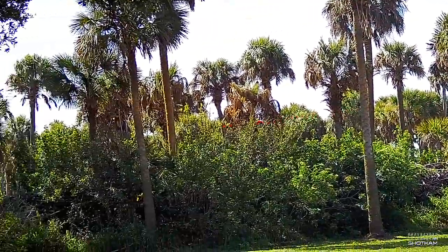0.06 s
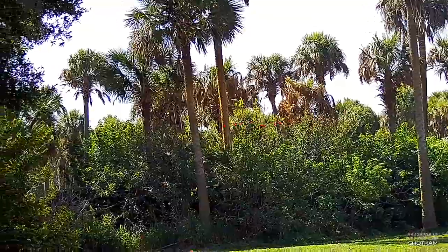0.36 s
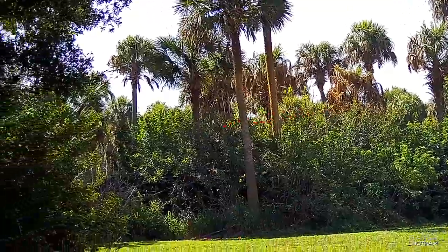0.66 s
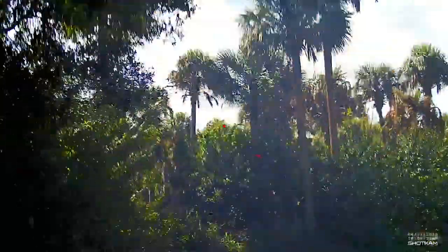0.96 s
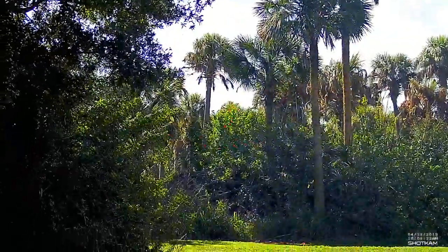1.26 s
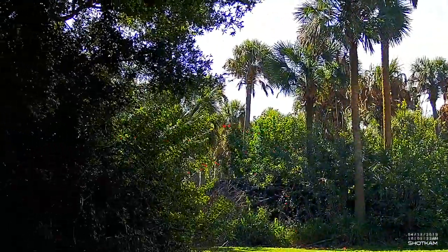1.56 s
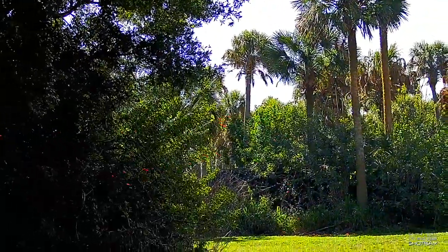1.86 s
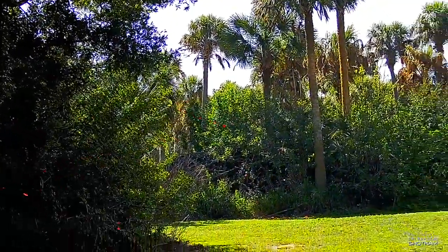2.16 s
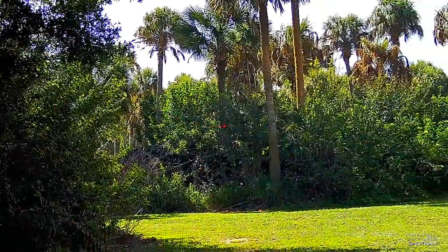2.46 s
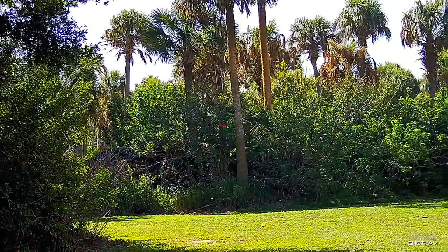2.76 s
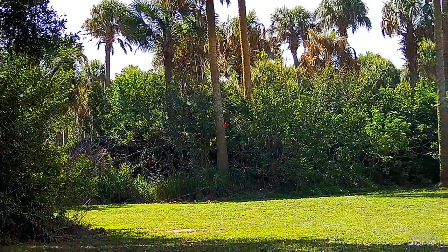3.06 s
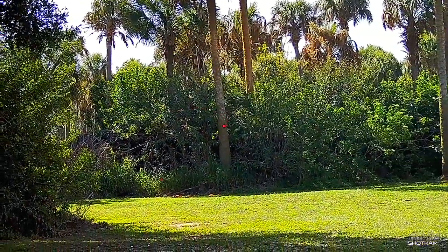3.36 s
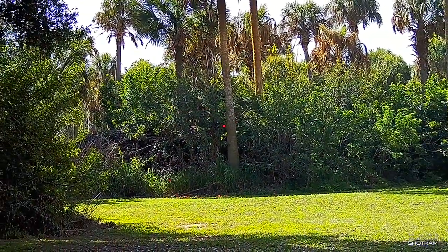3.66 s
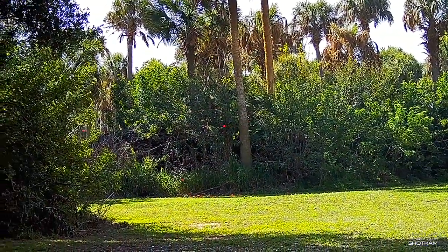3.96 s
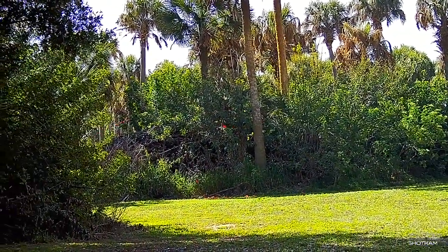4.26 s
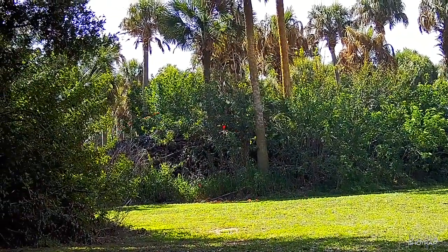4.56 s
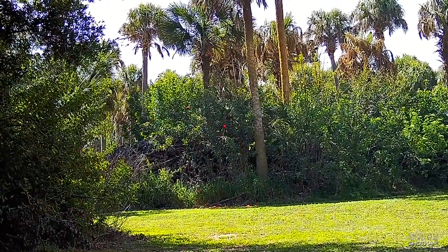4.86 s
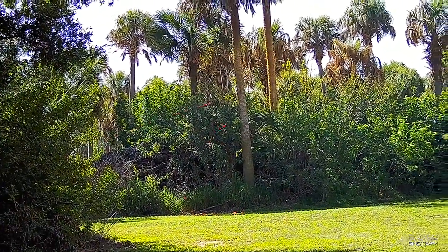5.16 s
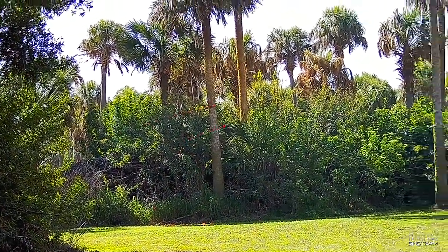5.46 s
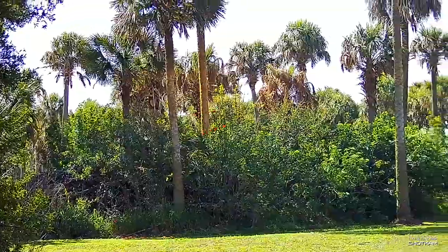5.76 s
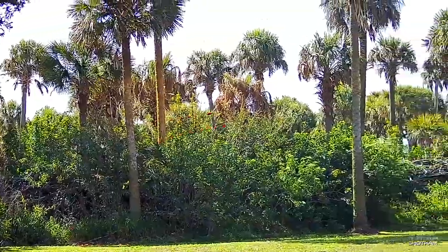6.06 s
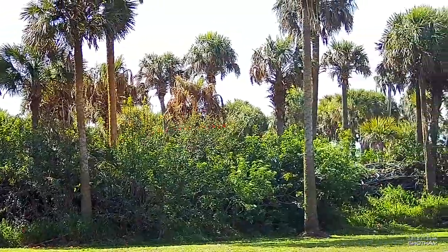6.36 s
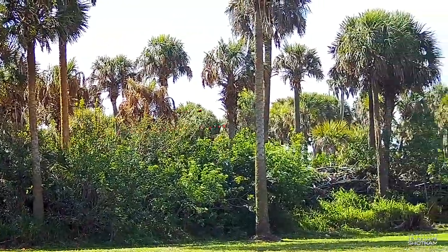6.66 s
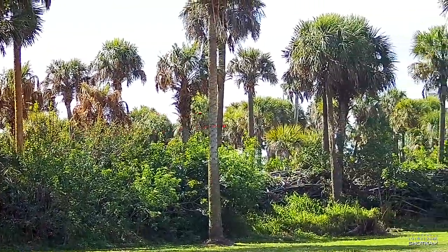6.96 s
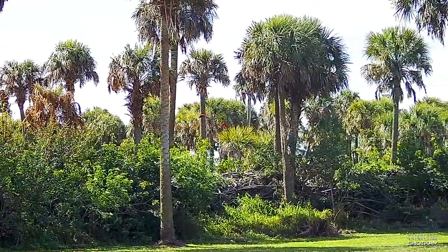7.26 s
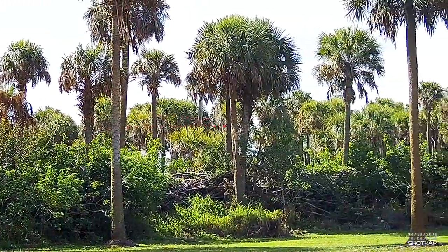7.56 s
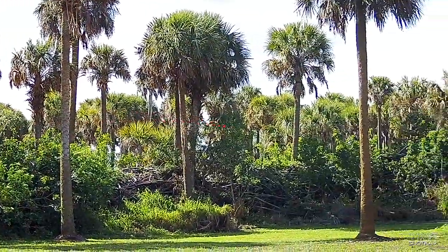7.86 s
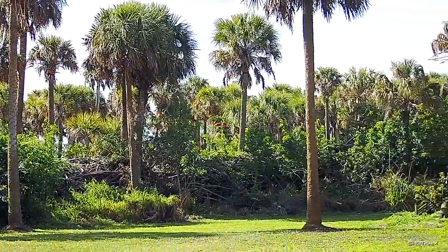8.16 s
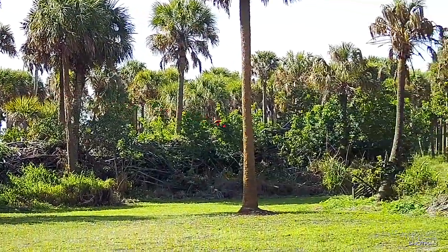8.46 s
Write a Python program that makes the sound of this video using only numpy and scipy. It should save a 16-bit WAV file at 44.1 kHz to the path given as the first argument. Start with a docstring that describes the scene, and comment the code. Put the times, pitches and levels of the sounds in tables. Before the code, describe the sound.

One very loud, distorted shotgun blast up close, echoing through trees, followed by two faint, dull shots far away.

```python
"""A faint hum and a light breeze, heard from a small camera clamped to a shotgun's barrel in a clearing.
The hammer falls and the gun fires once: the blast drives the microphone into hard clipping, the barrel
whips and rings, the bolt clatters, and the ring of palms throws back echoes. Two far shots follow.
The outdoor air, the woods and the far shots all sound through the camera's hollow, humming housing."""
import sys
import numpy as np
from scipy.fft import rfft, irfft, next_fast_len
from scipy.io import wavfile
from scipy.ndimage import uniform_filter1d, map_coordinates

SR = 44100
rng = np.random.default_rng(int(sys.argv[2]) if len(sys.argv) > 2 else 0)


def pcm_store(signal):
    """Save signal as 16-bit PCM."""
    levels = np.round(np.clip(np.atleast_2d(signal), -1, 1) * 32767)
    wavfile.write(sys.argv[1], SR, levels.astype(np.int16).T)


N = 375291
SHOT_S = 0.888

def amp(db):
    """Decibels to gain."""
    return 10 ** (np.asarray(db) / 20)

def unit(x):
    """x at rms 1."""
    return x / np.sqrt(np.mean(x ** 2) + 1e-20)

def since(start_s):
    """Seconds since start_s, zero before it."""
    return np.maximum(np.arange(N) / SR - start_s, 0)

def strike(start_s, rise_s, t60_s):
    """An envelope that rises and dies away."""
    t = since(start_s)
    return (1 - np.exp(-(t / rise_s) ** 2)) * np.exp(-np.log(1000) * t / t60_s)

def swell(peak_s, width_s, order=2):
    """A smooth hump; a higher order gives it steeper sides."""
    return np.exp(-np.abs((since(0) - peak_s) / width_s) ** order)

def wobble(rate_hz):
    """A smooth random curve, rate_hz knots a second."""
    knots = rng.standard_normal(int(N * rate_hz / SR) + 4)
    return map_coordinates(knots, [np.arange(N) * rate_hz / SR])

def filtered(x, response):
    """x through a frequency response."""
    size = next_fast_len(N + SR // 2)
    return irfft(rfft(x, size) * response(np.fft.rfftfreq(size, 1 / SR)), size)[:N]

def noise(response):
    """Noise of rms 1 with the given response."""
    return unit(filtered(rng.standard_normal(N), response))

def coloured(spectrum):
    """Noise of rms 1 shaped by rows of freq_hz, relative_db."""
    freq_hz, db = np.transpose(spectrum)
    return noise(lambda hz: amp(np.interp(np.log(hz + 1), np.log(freq_hz), db)))

def high_pass(hz, edge_hz):
    """Response of a gentle bass cut."""
    return 1j * hz / (edge_hz + 1j * hz)

def resonances(hz, modes):
    """Response of a hollow body: each resonance falls off steeply above its pitch."""
    peaks = sum((-1) ** k * amp(db) * pitch * width / (pitch ** 2 - hz ** 2 + 1j * hz * width)
                for k, (pitch, width, db) in enumerate(modes))
    return peaks * high_pass(hz, 80)

def burst(start_s, modes, t60_s, bright_hz, bass_cut_hz, rattle=.12):
    """A sharp push and its rattle ringing through resonances, rms 1 over its loudest 10 ms."""
    push = rattle * rng.standard_normal(N) * strike(start_s, .00089, t60_s)
    push[round(start_s * SR)] += 1
    ring = filtered(push, lambda hz: resonances(hz, modes)
                    * (high_pass(hz, bass_cut_hz) / (1 + 1j * hz / bright_hz)) ** 2)
    return ring / np.sqrt(uniform_filter1d(ring ** 2, size=441).max())

# wind right on the microphone: freq_hz, relative_db
BREEZE_SPECTRUM = [(10, 0), (30, 0), (60, -7), (110, -11), (200, -30), (500, -60)]
def breeze(level_db=-69, gusts_db=4):
    """Light air bumps softly against the microphone."""
    return amp(level_db) * unit(amp(gusts_db * wobble(7)) * coloured(BREEZE_SPECTRUM))

# the microphone's own noise: freq_hz, relative_db
FLOOR_SPECTRUM = [(10, -5.5), (30, -4), (70, -11), (130, -15), (300, -19), (600, -25.5), (1200, -27.5),
                  (3000, -31), (7000, -34)]
def microphone_floor(level_db=-65):
    """The microphone rumbles and hisses steadily."""
    return amp(level_db) * coloured(FLOOR_SPECTRUM)

# resonances of the camera housing around the microphone: pitch_hz, width_hz, gain_db
HOUSING_MODES = [(197, 30, 0), (508, 42, -12), (615, 70, -14), (705, 80, -15), (1075, 100, -21),
                 (1230, 130, -26), (1560, 200, -33), (2200, 250, -45)]
def housing_drone():
    """Noise of rms 1 hums in the housing's lowest resonance."""
    pitch_hz = HOUSING_MODES[0][0]
    return noise(lambda hz: resonances(hz, HOUSING_MODES[:1]) / (1 + ((hz - pitch_hz) / 60) ** 2))

# hum of the clearing's air at the microphone: time_s, level_db
HUM_LEVELS = [(0, -60), (.7, -66), (3.1, -63.5), (3.9, -75), (5.4, -66.5), (6.25, -62.5), (7.1, -73),
              (8.5, -76.5)]
def air_hum(upper_db=-14):
    """Outdoor air hums in the housing, more faintly in its upper resonances."""
    time_s, level_db = np.transpose(HUM_LEVELS)
    upper = amp(upper_db) * noise(lambda hz: resonances(hz, HOUSING_MODES[1:]) / (1 + (hz / 900) ** 2))
    return amp(np.interp(since(0), time_s, level_db)) * (housing_drone() + upper)

# two distant shots and first reflections: start_s, pop_db, bright_hz, bass_cut_hz, whump_db
FAR_ARRIVALS = [(4.233, -48, 1600, 304, -42), (4.242, -45, 800, 298, -55.5), (4.268, -42.5, 199, 101, -75),
                (5.612, -57.5, 650, 800, -72)]
def far_shots(t60_s=.073, whump_s=.0079):
    """Other guns far off: dull pops in the housing, each on a soft push of air."""
    out = np.zeros(N)
    for start_s, pop_db, bright_hz, bass_cut_hz, whump_db in FAR_ARRIVALS:
        pop = burst(start_s, HOUSING_MODES, t60_s, bright_hz, bass_cut_hz, rattle=.134)
        age = since(start_s) / whump_s
        whump = 2 * age * (2 - age) * np.exp(-age)
        out += amp(pop_db) * pop + amp(whump_db) * whump
    return out

# low rumble back from the trees: freq_hz, relative_db
RUMBLE_SPECTRUM = [(15, -2), (40, 0), (110, -3), (160, -5), (270, -1), (320, -2), (390, -19.5), (900, -45)]
def scatter(returns, air_hz, rumble_db):
    """Scatter from countless trees booms in the housing; distance dulls it above air_hz."""
    boom_power, body_power = np.zeros(N), np.zeros(N)
    for start_s, boom_db, body_db, t60_s in returns:
        envelope = strike(start_s, .02, t60_s)
        boom_power += (amp(boom_db) * envelope) ** 2
        body_power += (amp(body_db) * envelope) ** 2
    boom = housing_drone() + amp(rumble_db) * coloured(RUMBLE_SPECTRUM)
    body = noise(lambda hz: resonances(hz, HOUSING_MODES[1:])
                 * high_pass(hz, 180) / (1 + (hz / air_hz) ** 2))
    return np.sqrt(boom_power) * boom + np.sqrt(body_power) * body

# each shot dying evenly in the deep woods: start_s, boom_db, body_db, t60_s
WOOD_WASHES = [(.888, -26.5, -35, 2.2), (4.245, -51, -62.5, 3.26), (5.612, -69.5, -74.5, 2)]
# soft echoes from stands of trees farther out: start_s, boom_db, body_db
TREE_ECHOES = [(1.615, -38, -44), (1.743, -39.5, -51.5), (2.06, -59, -60.5), (4.495, -47, -64),
               (4.6, -49.5, -68), (4.81, -50.5, -70.5)]
def woods(echo_t60_s=.662):
    """The trees answer the near shot, then more dully the far ones."""
    bushes = (SHOT_S, -13, -11.5, .41)  # a wash from close by, strong and brief
    returns = [bushes, *WOOD_WASHES] + [(*row, echo_t60_s) for row in TREE_ECHOES]
    first_far_s = FAR_ARRIVALS[0][0]
    near = [row for row in returns if row[0] < first_far_s]
    far = [row for row in returns if row[0] >= first_far_s]
    return scatter(near, air_hz=4000, rumble_db=-9) + scatter(far, air_hz=2600, rumble_db=-9.5)

# sizzle off the palms around the clearing: freq_hz, relative_db
FROND_SPECTRUM = [(700, -27), (1400, 5.5), (2000, 3), (2700, -3), (3600, -3), (4400, -15.5), (5400, -5.5),
                  (6200, -20.5), (7500, -30)]
def fronds(level_db=-37, t60_s=.9):
    """Nearby fronds throw back the treble of the blast."""
    return amp(level_db) * strike(SHOT_S, .02, t60_s) * coloured(FROND_SPECTRUM)

# resonances of the stock and receiver: pitch_hz, width_hz, gain_db
RECEIVER_MODES = [(176, 26, 3.5), (340, 40, -14), (478, 50, -8.5), (708, 42, 3.5), (1071, 80, -7.5),
                  (1234.5, 140, -12.5), (1609, 150, -20.5), (2220, 160, -26.5), (3050, 400, -36.5)]
# close up, the hammer, the bolt at its stop, parts settling after recoil, then a later thump as the gun is
# handled: # start_s, rattle_db, bright_hz, rattle_t60_s, thud_db
GUN_KNOCKS = [(.813, -37, 1200, 0.051, -25.5), (.978, -17.5, 9000, .04, -50.5), (.991, -15, 9000, .05, -50),
              (1.297, -43.5, 9000, 0.017, -68), (1.372, -30, 2487, 0.058, -39),
              (1.379, -33.5, 2500, 0.03, -32), (1.406, -40.5, 2010, 0.053, -56.5),
              (1.413, -37, 2000, 0.19, -56), (3.331, -53.5, 149.7, .05, -45)]
def knocks(thud_hz=88):
    """Parts meet: the receiver rattles and the whole gun thuds; harder contacts rattle with less bass."""
    out = np.zeros(N)
    for start_s, rattle_db, bright_hz, t60_s, thud_db in GUN_KNOCKS:
        rattle = burst(start_s, RECEIVER_MODES, t60_s, bright_hz, bass_cut_hz=.08 * bright_hz)
        thud = strike(start_s, .006, .15) * np.sin(2 * np.pi * thud_hz * since(start_s))
        out += amp(rattle_db) * rattle + amp(thud_db) * thud
    return out

# the sliding bolt, close to the microphone: freq_hz, relative_db
BOLT_SPECTRUM = [(300, -14.5), (700, 1), (1300, 0.5), (2300, -0.5), (3500, -6), (4400, -12.5), (5600, -8.5),
                 (7500, -19.5)]
def bolt_scrape(level_db=-17, delay_s=.062, width_s=.041):
    """The bolt scrapes back just after the shot, heard between the clipped swings of the barrel."""
    return amp(level_db) * swell(SHOT_S + delay_s, width_s, order=4) * coloured(BOLT_SPECTRUM)

# the barrel's ring, right at the camera clamp: pitch_hz, level_db, t60_s
BARREL_MODES = [(349, -20, .95), (1203, -26, .85), (1221, -12.5, .88), (1486, -31, .6), (183, -9, .55),
                (511, -17, .3), (1098, -22, .35), (1163, -26, .36)]
def barrel(jolt_hz=130, bend_hz=73.5):
    """Recoil jolts the mount and whips the barrel in its slow bending mode; higher modes ring on."""
    t = since(SHOT_S)
    jolt = amp(31) * strike(SHOT_S, .019, .072) * np.sin(2 * np.pi * jolt_hz * t)
    whip = -amp(34) * strike(SHOT_S, .08, .168) * np.sin(2 * np.pi * bend_hz * t)
    ring = sum(amp(level_db) * strike(SHOT_S, .0037, t60_s) * np.sin(2 * np.pi * pitch_hz * t)
               for pitch_hz, level_db, t60_s in BARREL_MODES)
    return jolt + whip + ring

# crack and roar of the muzzle, within a barrel's length of the microphone: freq_hz, relative_db
CRACK_SPECTRUM = [(30, -19.5), (300, -9), (520, 2), (780, -7), (1100, -9), (1500, -13.5), (3000, -19.5),
                  (5000, -25), (8000, -35)]
ROAR_SPECTRUM = [(25, -16.5), (50, -1.5), (80, -7), (130, -3), (240, -4.5), (350, -9), (600, -17),
                 (1200, -27.5), (3000, -38.5), (7500, -49.5)]
def muzzle_blast():
    """A recoil push, a crack, a deep roar, then the suction that follows the overpressure."""
    push = amp(-19) * swell(SHOT_S - .0065, .0024)
    crack = amp(25) * strike(SHOT_S - .001, rise_s=.011, t60_s=.055) * coloured(CRACK_SPECTRUM)
    roar = amp(13) * strike(SHOT_S, rise_s=.0079, t60_s=.18) * coloured(ROAR_SPECTRUM)
    suction = -amp(-11) * swell(SHOT_S + .085, .04)
    return push + crack + roar + suction

def scene():
    """The gun up close, the clearing around it and the far shots, all at one microphone."""
    gun = muzzle_blast() + barrel() + bolt_scrape() + knocks()
    return (gun + fronds() + woods() + far_shots() + air_hum() + microphone_floor() + breeze())[None]

def record(dry, ceiling_db=-6, leak_db=-23, top_hz=7100):
    """The microphone clips hard, treble shivering on the flat tops; the camera cuts off above top_hz."""
    ceiling = amp(ceiling_db)
    clipped = np.clip(dry[0], -ceiling, ceiling)
    overload_treble = filtered(dry[0] - clipped, lambda hz: high_pass(hz, 990) ** 2)
    shiver = amp(leak_db) * np.clip(overload_treble, -ceiling, ceiling)
    return filtered(clipped + shiver, lambda hz: 1 / np.sqrt(1 + (hz / top_hz) ** 80))[None]

dry = scene()
out = record(dry)
pcm_store(out)
```